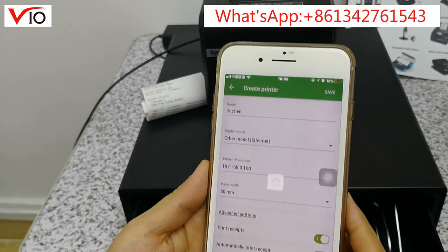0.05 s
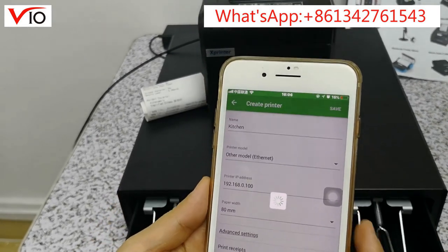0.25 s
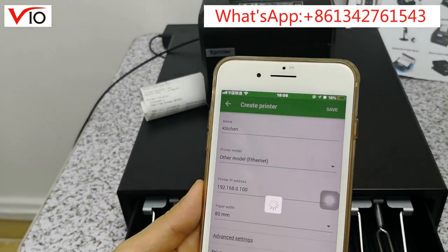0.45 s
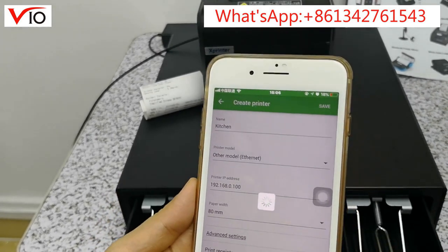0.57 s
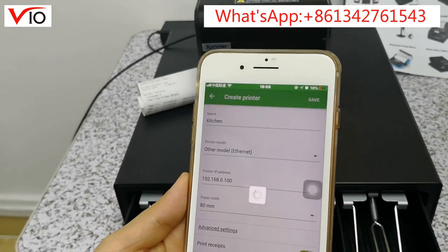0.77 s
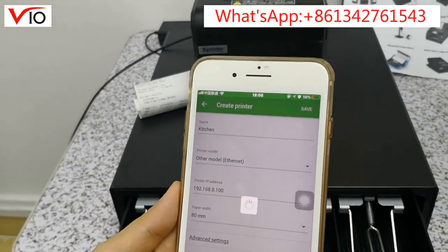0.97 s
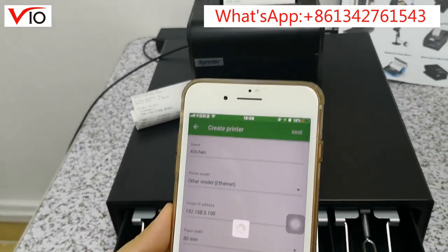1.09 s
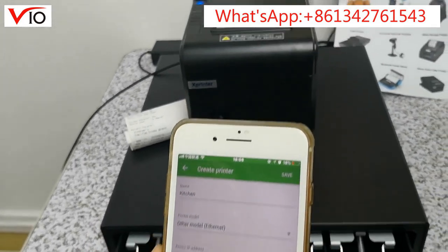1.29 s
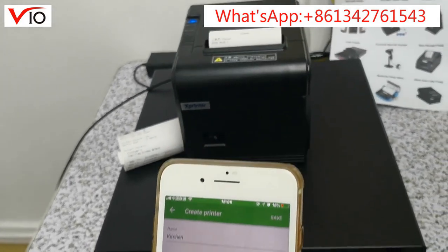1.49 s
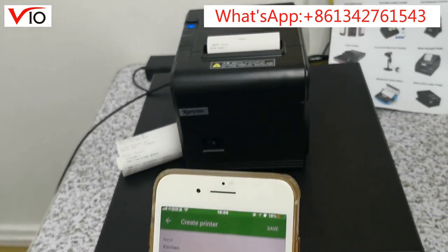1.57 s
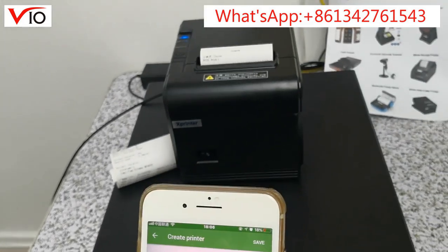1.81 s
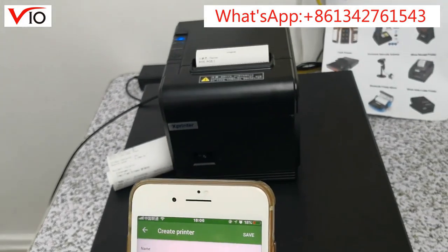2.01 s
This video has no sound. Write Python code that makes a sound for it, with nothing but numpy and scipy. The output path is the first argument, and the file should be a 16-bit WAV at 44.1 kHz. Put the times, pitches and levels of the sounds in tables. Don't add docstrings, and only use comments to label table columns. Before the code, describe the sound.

A steel cash drawer springs open close to a handheld phone microphone in a small hard room: fading clatter, latch snap, loud metallic bang and rattle, jerky scraping slide with light knocks, then quiet ventilation rumble.

```python
import sys
import numpy as np
from scipy import signal
from scipy.fft import rfft, irfft
from scipy.io import wavfile
from scipy.ndimage import uniform_filter1d

SR = 44100
rng = np.random.default_rng(int(sys.argv[2]) if len(sys.argv) > 2 else 0)


def ratio(d):
    e = np.asarray(d, float) / 20
    return 10 ** e


def wav_out(sig):
    wavfile.write(sys.argv[1], SR, np.round(np.clip(np.atleast_2d(sig).T, -1, 1) * 32767).astype(np.int16))


N = 90404
T = np.arange(N) / SR

# pitch_hz, level_db
SCRAPE_COLOUR = [(400, -12), (1000, -17), (2200, -5.5), (3100, -3), (3700, -6), (6300, -5), (8500, -8.5),
                 (15000, -36)]


def noise():
    return rng.standard_normal(N)


def level(x, db):
    return x * ratio(db) / np.sqrt(np.mean(x ** 2))


def highpass(x, hz):
    return signal.sosfilt(signal.butter(2, hz, "high", fs=SR, output="sos"), x)


def colour(x, points, unit=True):
    size, p = 4096, np.array(points)
    hz = np.maximum(np.arange(size // 2 + 1) * SR / size, 1)
    gain_db = np.interp(np.log(hz), np.log(np.maximum(p[:, 0], 1)), p[:, 1])
    cepstrum = irfft(np.log(ratio(gain_db)))
    cepstrum[1:size // 2] *= 2
    cepstrum[size // 2 + 1:] = 0
    response = irfft(np.exp(rfft(cepstrum)))
    if unit:
        response = response / np.sqrt(np.sum(response ** 2))
    return signal.fftconvolve(x, response)[:N]


def band(x, hz, width_hz):
    return signal.lfilter(*signal.iirpeak(hz, hz / width_hz, fs=SR), x)


def ring(x, modes):
    out = np.zeros(N)
    for k, (hz, db, t60_s) in enumerate(modes):
        pole = np.exp(2j * np.pi * hz / SR - np.log(1000) / (t60_s * SR))
        out += (-1) ** k * ratio(db) * signal.lfilter([1], [1, -pole], x).imag
    return out


def walk(rate_hz):
    k = int(SR / rate_hz)
    steps = np.repeat(rng.standard_normal(N // k + 1), k)
    return level(uniform_filter1d(uniform_filter1d(steps, k), k)[:N], 0)


def grit(spread_db):
    return level(noise() * ratio(spread_db * rng.exponential(size=N)), 0)


def bump(centre_s, length_s):
    return np.exp(-((T - centre_s) / length_s) ** 2)


def spread(source, points):
    mid, side = colour(source(), points), colour(source(), points)
    side = highpass(side, 417)
    return np.array([mid + side, mid - side])


def hits(table, crack_s):
    push, crack = np.zeros(N), np.zeros(N)
    for start_s, db, soft_ms, ring_db in table:
        age = np.maximum(T - start_s, 0)
        u = age / (max(soft_ms, .02) / 1000)
        push += ratio(db + ring_db) * u * np.exp(1 - u) / max(soft_ms * SR / 1000, 1)
        crack += ratio(db) * (T >= start_s) * np.exp(-age / crack_s)
    return push, crack * noise()


def ventilation():
    # pitch_hz, level_db
    rumble_colour = [(20, -9), (55, -3.5), (130, -3.5), (300, -17), (480, -24.5), (2000, -26.5),
                     (2900, -31.5), (3700, -39.5)]
    # pitch_hz, level_db
    hiss_colour = [(2000, -13), (4000, 0.5), (6500, -1.5), (9000, -8), (15500, -18)]
    rumble = spread(lambda: noise() * ratio(0.4 * walk(13.9)), rumble_colour + [(9000, -80)])
    return level(rumble, -49.5) + level(spread(noise, hiss_colour), -70)


def earlier_clatter():
    # pitch_hz, level_db
    clatter_colour = [(24, -37), (40, -31), (284, -1.5), (346, -18.5), (432, -11), (784, -14.5),
                      (1290, -16), (7310, -40), (15000, -62.5)]
    fall_db_s = 65.5
    clatter = level(spread(lambda: grit(2.6), clatter_colour), -30.5)
    return clatter * ratio(-fall_db_s * T + .5 * walk(83))


def earlier_boom():
    boom_hz = 286.4
    boom = band(band(noise(), boom_hz, 33), boom_hz, 100)
    return level(boom, -39.5) * bump(0, 0.52)


def latch():
    start_s, rise_s, fall_s = .197, .004, .006
    age = np.maximum(T - start_s, 0)
    shape = np.minimum(age / rise_s, 1) ** 2 * np.exp(-np.maximum(age - rise_s, 0) / fall_s)
    return ratio(-15) * colour(shape * grit(1.0), SCRAPE_COLOUR)


def bang():
    # start_s, strength_db, contact_softness_ms, body_ring_db
    blows = [
        (.2025, -12, 0.044, -27),
        (.2075, -5, 0.067, 5),
        (.2205, -4.5, 0.29, 7),
        (.235, -6.5, 0.067, 8),
        (.251, -13, 0.32, -1),
        (.271, -7, 0.26, -5),
        (.291, -19, 0.25, 7),
        (.316, -23, 0.16, 9),
        (.333, -18, 0.11, -8),
        (.348, -16, 0.19, 2),
    ]
    # time_s, level_db
    rattle_level = [
        (.197, -33),
        (.206, -13.5),
        (.225, -21.5),
        (.262, -21.5),
        (.274, -17.5),
        (.3, -32.5),
        (.36, -31.5),
        (.43, -46),
    ]
    # pitch_hz, level_db
    rattle_colour = [(60, -24.5), (280, -8), (480, -19.5), (800, -13), (1900, -13.5), (3600, -21),
                     (6500, -30), (15000, -53.5)]
    # pitch_hz, level_db, t60_s
    case_modes = [(53.6, -11, 0.14), (119, -10.5, 0.34), (186, -6.5, 0.12), (249.5, -1.5, 0.11),
                  (304, -3, 0.15), (721, -4.5, 0.086), (834, 0, 0.043), (907, -14.5, 0.3),
                  (1270, -19, 0.035), (1622, -2, .08), (1810, -4, 0.1), (2000, -1, 0.13),
                  (2177, -1.5, 0.07), (2700, -12, 0.026)]
    push, crack = hits(blows, 0.0012)
    time_s, db = np.transpose(rattle_level)
    shaking = ratio(np.interp(T, time_s, db, left=-120, right=-120))
    rattle = grit(3) * shaking * ratio(2.9 * walk(91.2))
    case = highpass(ring(push + .05 * rattle, case_modes), 45)
    crack = ratio(-6) * highpass(crack, 330)
    return ratio(-24) * case + colour(crack + rattle, rattle_colour)


def pushes():
    # start_s, end_s, scrape_start_db, scrape_end_db, roller_load_db
    strokes = [
        (0.348, 0.506, -45.5, -40, -37),
        (0.498, 0.59, -41, -39, -39.5),
        (0.597, 0.667, -72, -42.5, -44.5),
        (.667, 0.719, -35, -36, -39),
        (0.745, .765, -40, -55, -39.5),
        (.772, .83, -51, -44, -40),
        (0.825, 0.873, -48.5, -59.5, -46),
        (0.943, 0.984, -43.5, -54, -42),
        (0.986, 1.053, -51, -70, -45.5),
    ]
    grip_s, let_go_s, roll_slew_s = 0.0033, 0.0037, 0.012
    scrape, load = np.zeros(N), np.zeros(N)
    for t0, t1, db0, db1, roll_db in strokes:
        on = np.clip((T - t0) / grip_s, 0, 1) * np.exp(-np.maximum(T - t1, 0) / let_go_s)
        scrape += on * ratio(np.interp(T, [t0, t1], [db0, db1]))
        load += on * ratio(roll_db)
    return scrape, uniform_filter1d(load, int(roll_slew_s * SR))


def slide():
    # pitch_hz, width_hz, level_db
    rail_modes = [(1773, 133, 5.5), (3510, 360, -7), (4530, 33, -7), (5350, 410, -13.5), (6900, 280, -16.5)]
    # pitch_hz, width_hz, level_db
    roller_modes = [(58.4, 18, -14.5), (176, 32, -5), (293.7, 45, 0), (391, 44, -7.5), (765, 433, -12)]
    press, load = pushes()
    rub = grit(3.5) * ratio(0.89 * walk(89.2))
    rail = sum(ratio(db + 4.1 * walk(28.54)) * band(rub, hz, width) for hz, width, db in rail_modes)
    scrape = press * (colour(rub, SCRAPE_COLOUR) + level(rail, -1.5))
    roll = noise() * ratio(3.0 * walk(29.9))
    rumble = sum(ratio(db) * band(band(roll, hz, width), hz, 2 * width) for hz, width, db in roller_modes)
    return scrape + load * level(rumble, 0)


def knocks():
    # start_s, strength_db, contact_softness_ms, ring_db
    taps = [(.388, -24.5, 0.033, -6), (.651, -37, .08, 11), (.6965, -39, 0.043, -23),
            (.7125, -24, 0.035, -8), (.724, -28, 0.053, -10.5), (.7395, -26, 0.031, -12),
            (.751, -32, 0.065, -0.5), (.7715, -19, 0.0097, -33), (.803, -25, 0.045, -19),
            (.8365, -33, 0.043, 8), (.844, -38, .07, -5), (.947, -32.5, 0.052, 9.5),
            (.9745, -27, 0.089, 6.5), (.984, -35, 0.17, 15.5), (1.05, -35, 0.079, -14)]
    # pitch_hz, level_db, t60_s
    tray_modes = [(375, -9, 0.077), (1030, -6.5, 0.043), (1173, -1.5, 0.017), (1730, -7, 0.053),
                  (1953, 3.5, 0.032), (2730, -1, 0.019), (3000, -2, .012), (7750, -6, .015)]
    # pitch_hz, level_db
    tick_colour = [(800, -26), (2500, 12), (6000, 0), (9500, -3.5), (15500, -15)]
    push, crack = hits(taps, 0.00083)
    return ratio(-12) * ring(push + 0.074 * crack, tray_modes) + colour(crack, tick_colour)


def even(path, tilt):
    hz = np.arange(1, N // 2 + 1) * SR / N
    power = uniform_filter1d(abs(rfft(path)[1:]) ** 2, int(70 * N / SR))
    flat = colour(path, np.c_[hz, -10 * np.log10(power)], unit=False)
    return colour(flat, tilt, unit=False)


def fade(t60_s, db):
    return ratio(db - 60 * T / t60_s) * np.sqrt(np.log(1000) / (t60_s * SR)) * (T > .0004)


def room(x):
    # pitch_hz, left_minus_right_db
    port_tilt = [(250, 0), (520, 6), (1000, -1), (2000, 1), (4400, -3.5), (8100, -2), (12000, 0)]
    diffuse = spread(noise, [(20, 0), (20000, 0)])
    low = signal.sosfilt(signal.butter(1, 1500, fs=SR, output="sos"), diffuse)
    near_room, beyond = fade(0.42, -2), fade(1.5, -21)
    tail = low * (near_room + beyond) + (diffuse - low) * fade(0.21, 1)
    counter = spread(noise, [(350, -26.5), (650, -4), (20000, -3.5)]) * fade(0.013, 3.5)
    lag_ms, lag_from_hz = .44, 1420
    click = 1. * (T == 0)
    bass = signal.sosfilt(signal.butter(2, lag_from_hz, fs=SR, output="sos"), click)
    late = bass + np.roll(click - bass, int(lag_ms * SR / 1000))
    paths = ratio(-2.5) * np.array([late, click]) + tail + counter
    paths = np.array([even(paths[k], np.array(port_tilt) * [1, .5 - k]) for k in (0, 1)])
    return signal.fftconvolve(x[None], paths)[:, :N]


def shuffle():
    brush = np.array([band(grit(2.6), 1880, 1470) for _ in range(2)])
    return level(brush, -61.5) * bump(1.206, 0.084)


def whine():
    fade_in = (1 + np.tanh((T - 1.4) / 0.17)) / 2
    return ratio(-75 + 0.57 * walk(15.8)) * np.sin(2 * np.pi * 4100 * T) * fade_in


def handling():
    return ratio(-44) * np.sin(2 * np.pi * 50 * T + 2.5 * walk(33)) * bump(1.955, .045)


def scene():
    before = ventilation() + earlier_clatter() + earlier_boom()
    drawer = room(latch() + bang() + slide() + knocks()) * ratio(-0.5)
    return before + drawer + shuffle() + whine() + handling()


def band_limit(x):
    return signal.sosfilt(signal.butter(12, 15960, fs=SR, output="sos"), x)


def record(dry):
    mic = dry + (ratio(8.5) - 1) * band(dry, 7510, 650)
    ceiling = 1.3
    return band_limit(ceiling * np.tanh(mic / ceiling))


dry = scene()
out = record(dry)
wav_out(out)
```